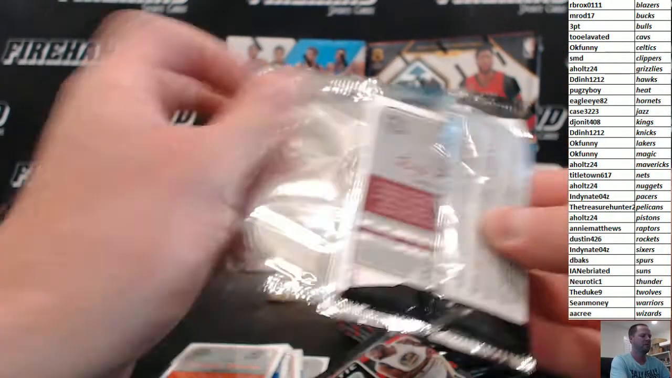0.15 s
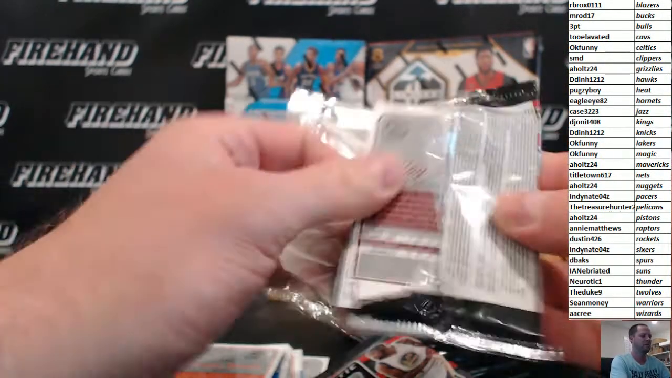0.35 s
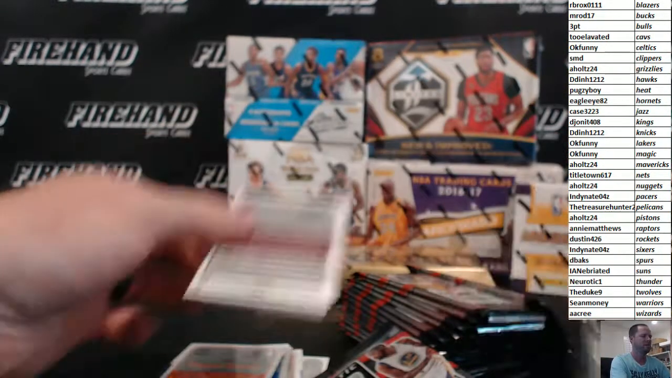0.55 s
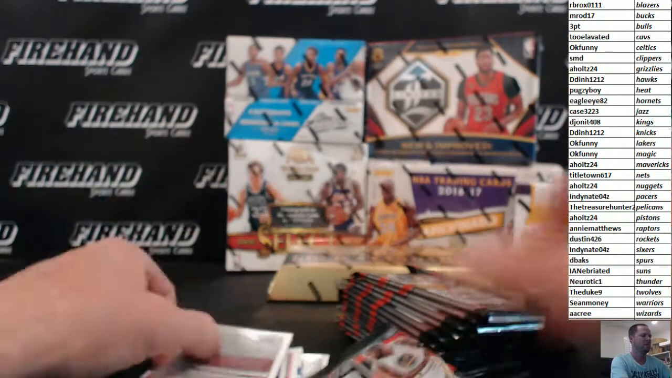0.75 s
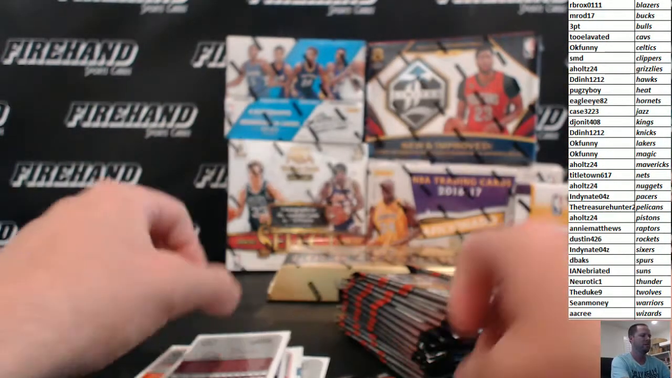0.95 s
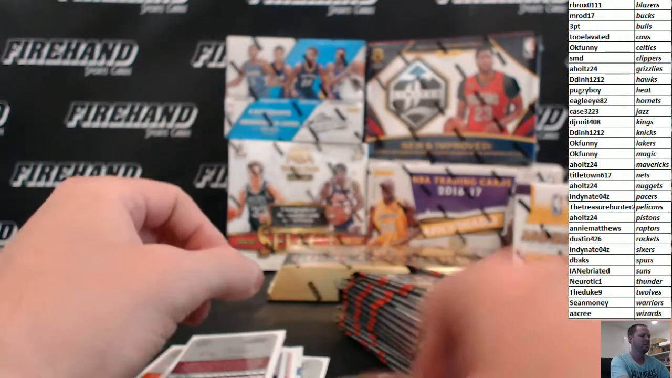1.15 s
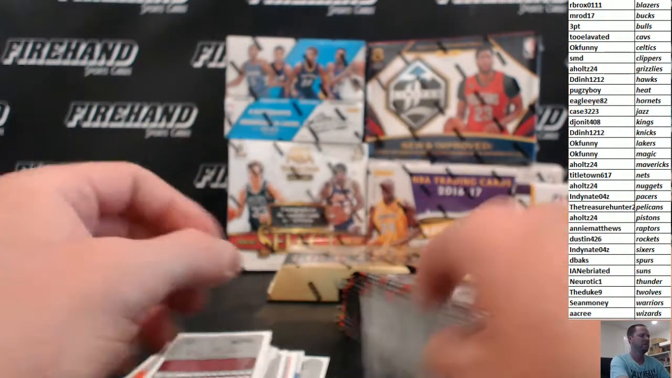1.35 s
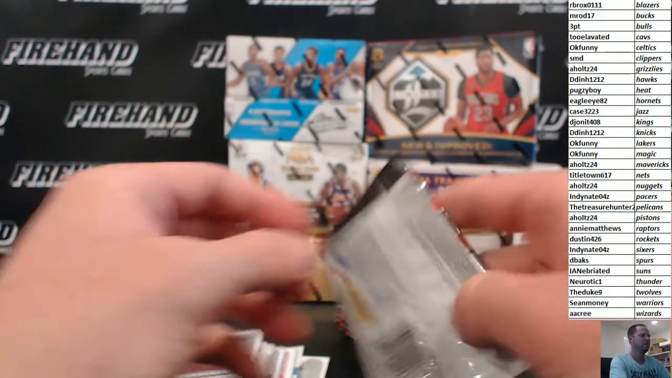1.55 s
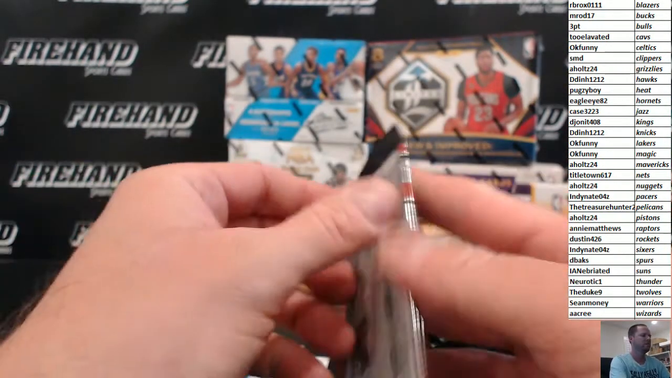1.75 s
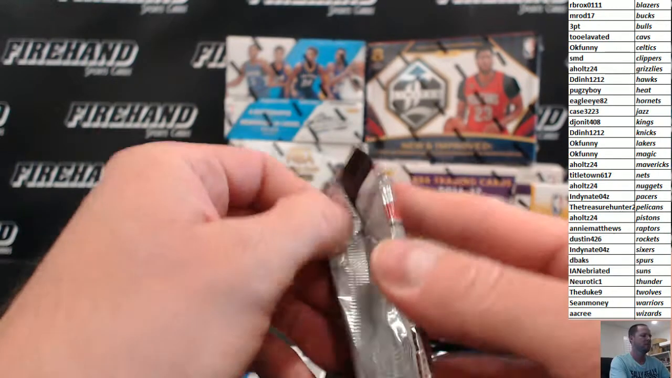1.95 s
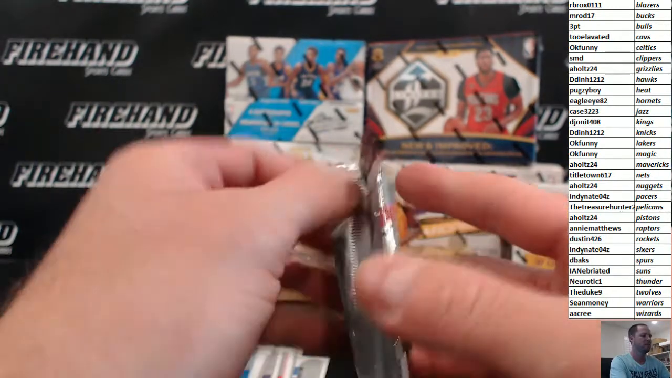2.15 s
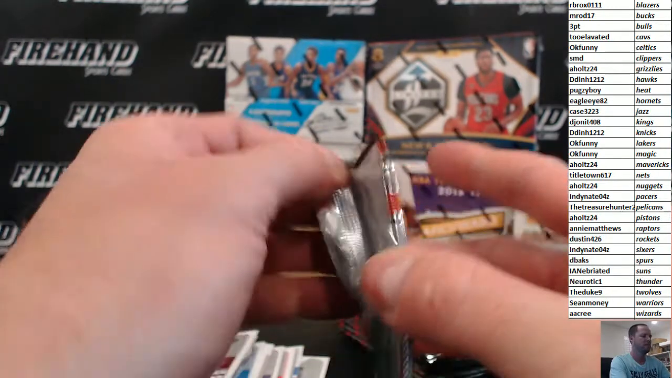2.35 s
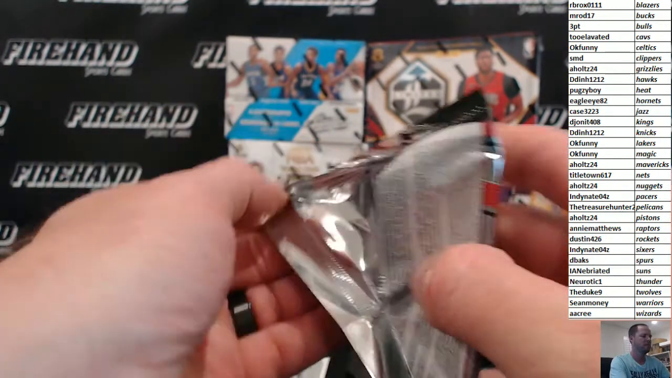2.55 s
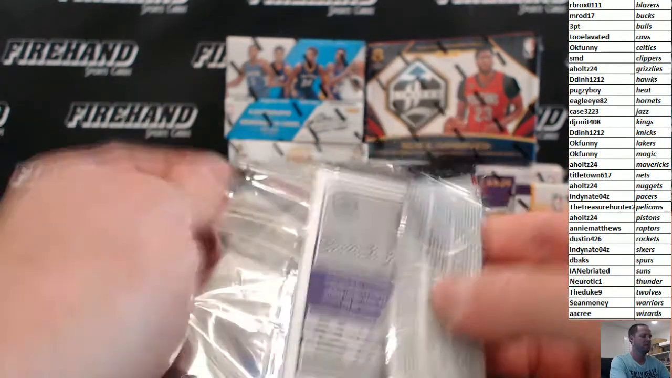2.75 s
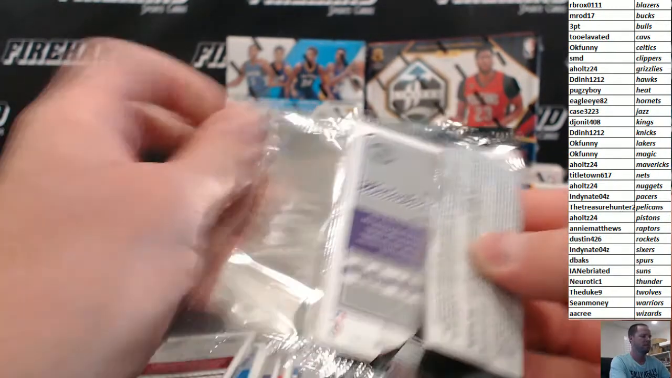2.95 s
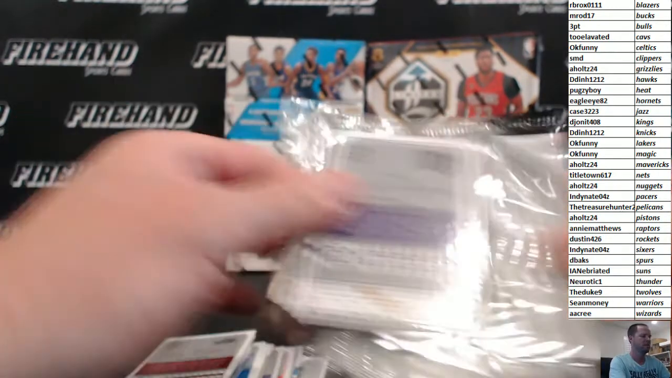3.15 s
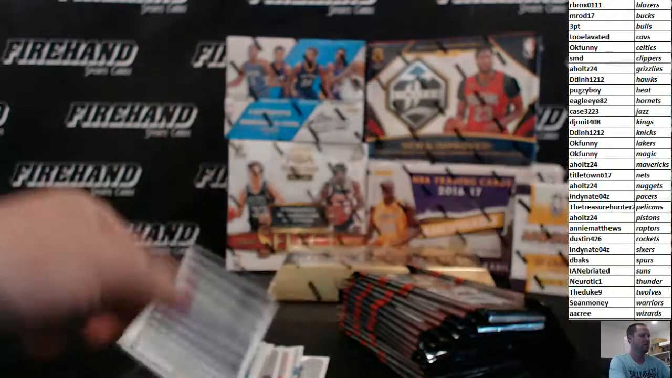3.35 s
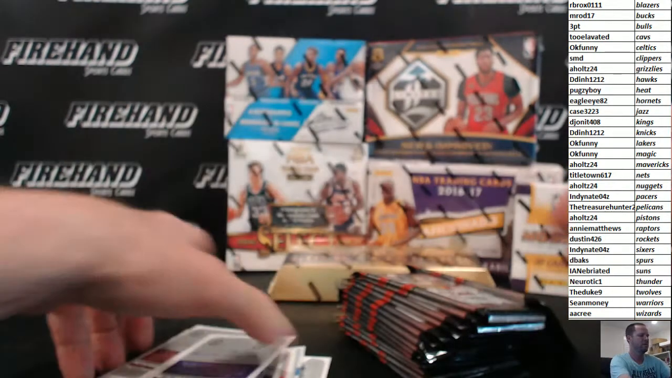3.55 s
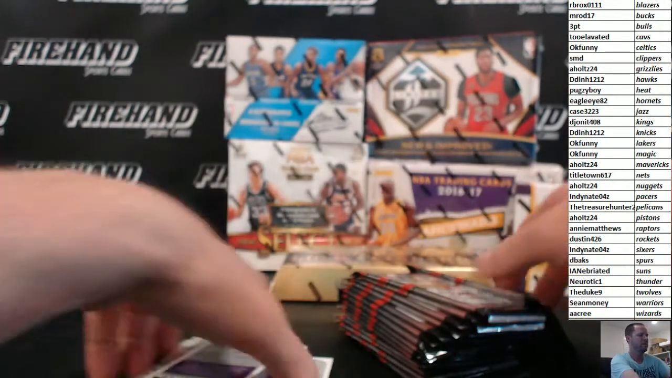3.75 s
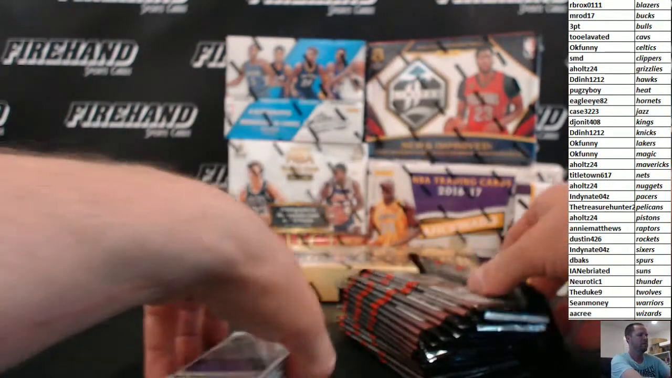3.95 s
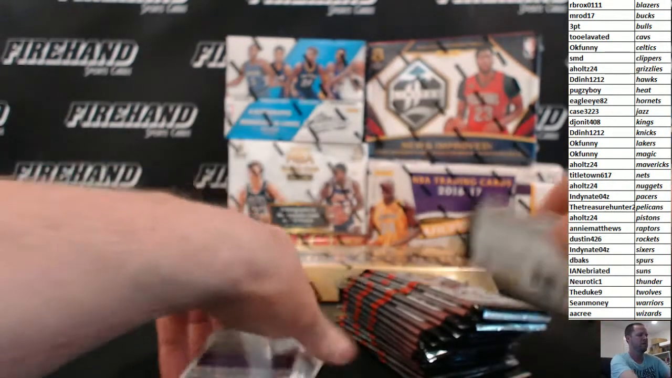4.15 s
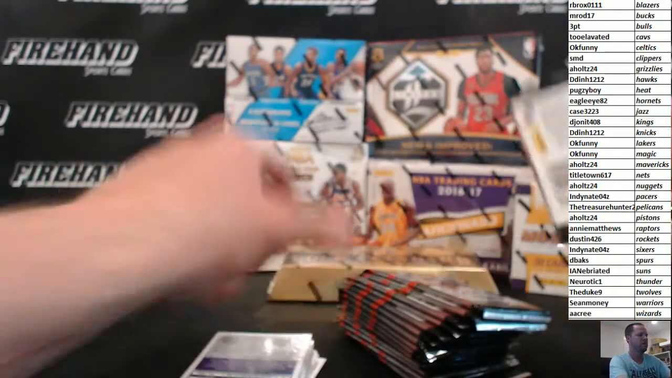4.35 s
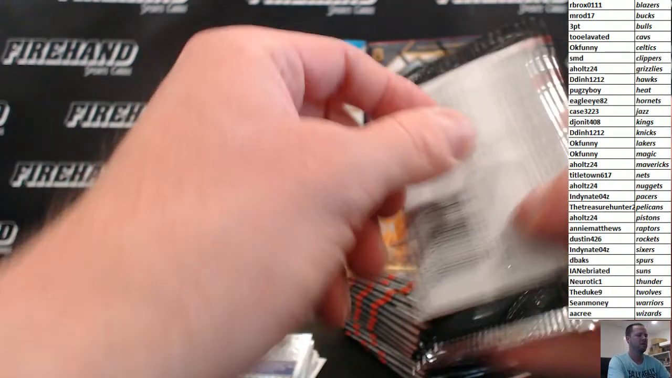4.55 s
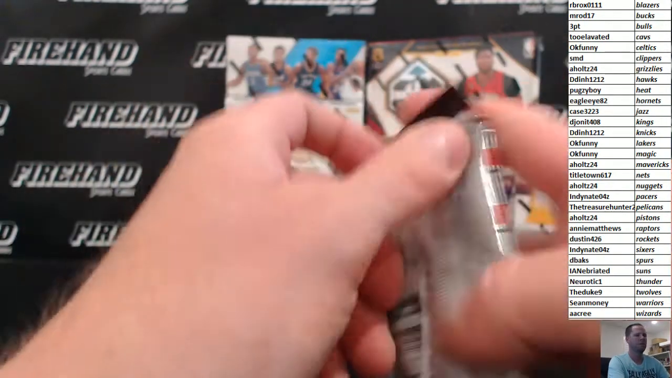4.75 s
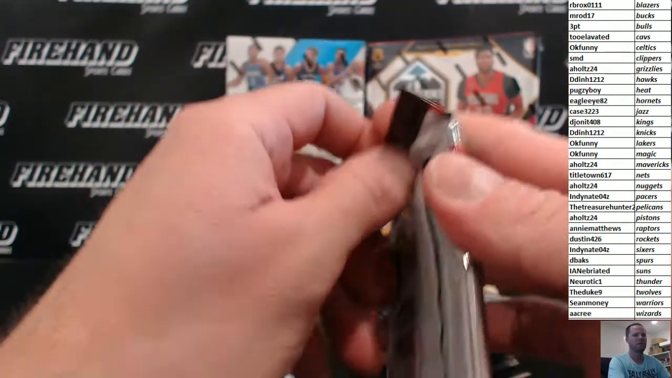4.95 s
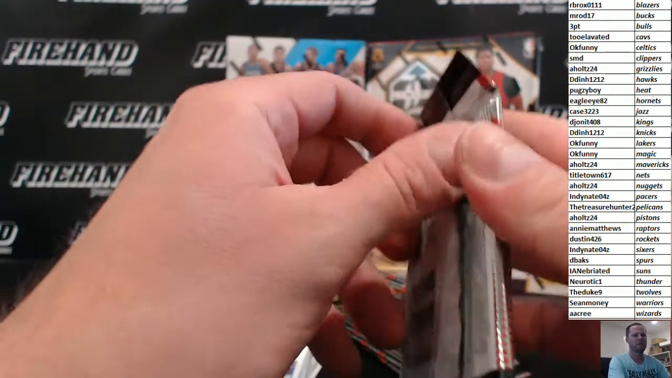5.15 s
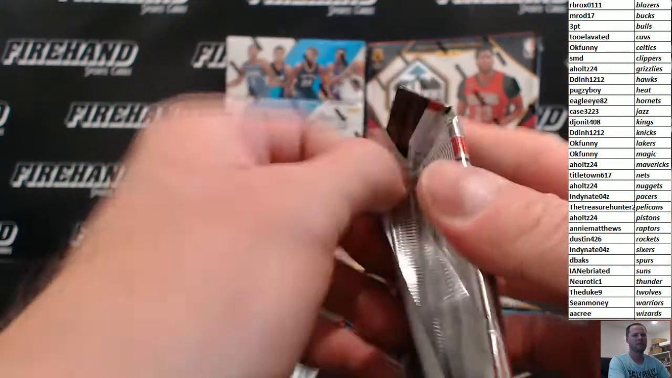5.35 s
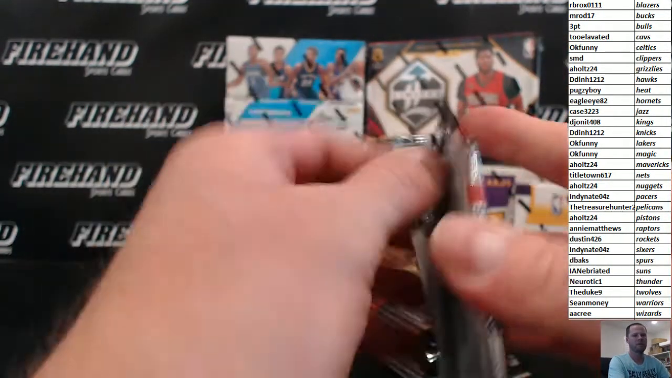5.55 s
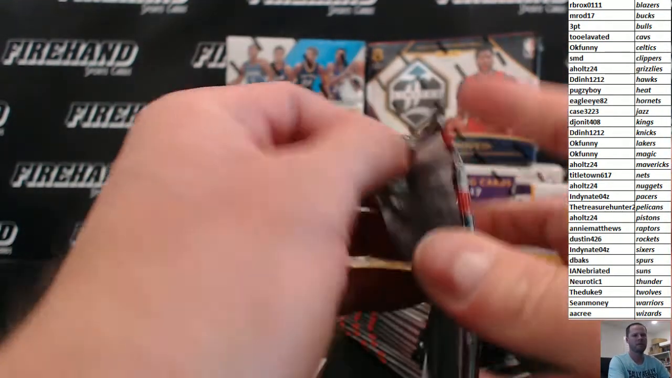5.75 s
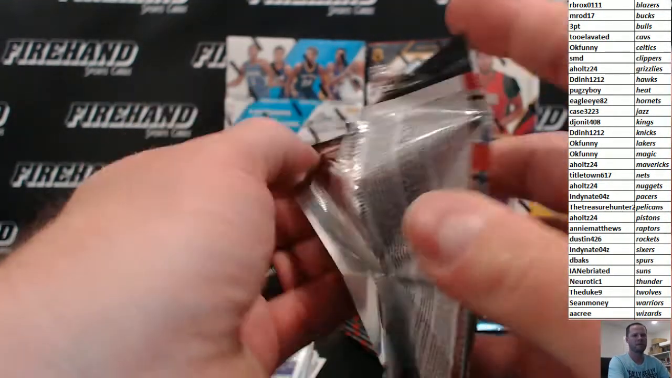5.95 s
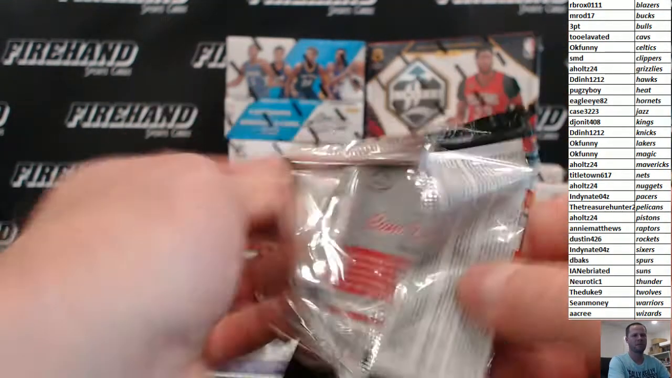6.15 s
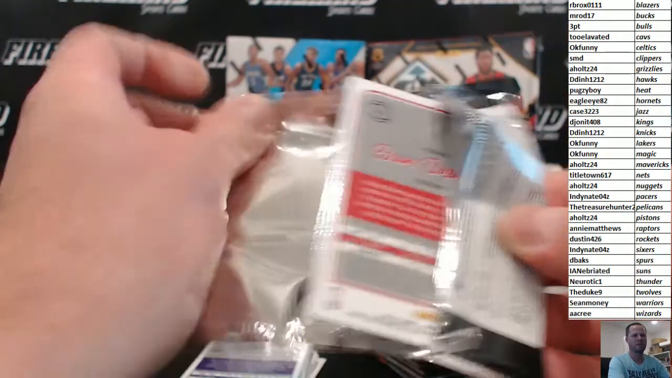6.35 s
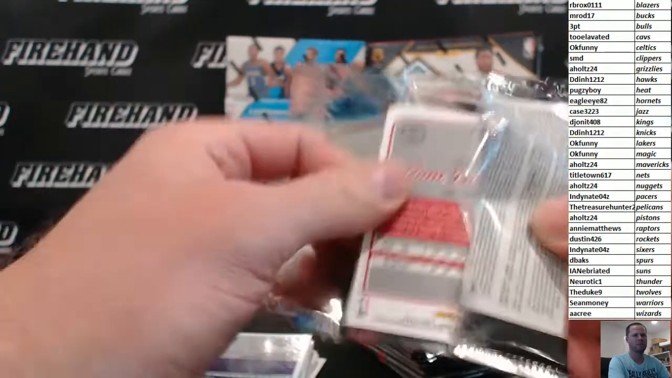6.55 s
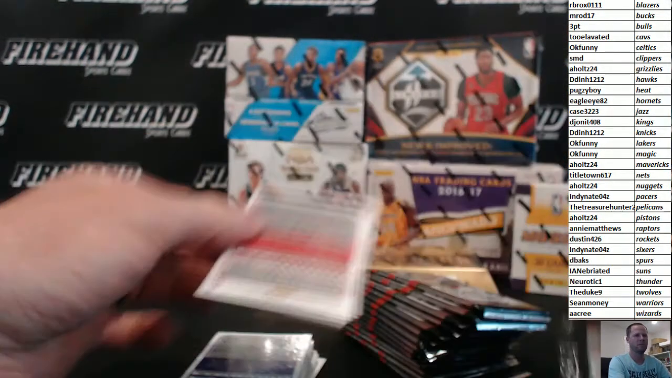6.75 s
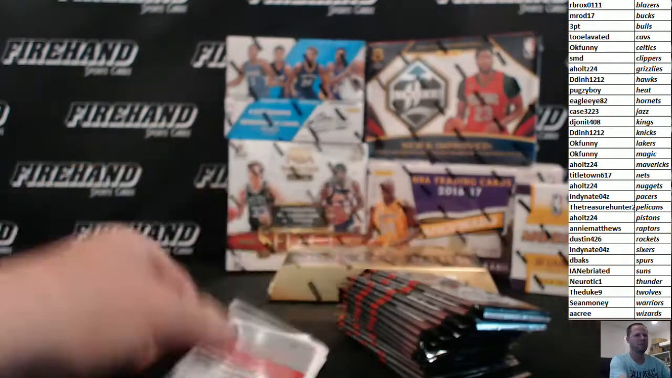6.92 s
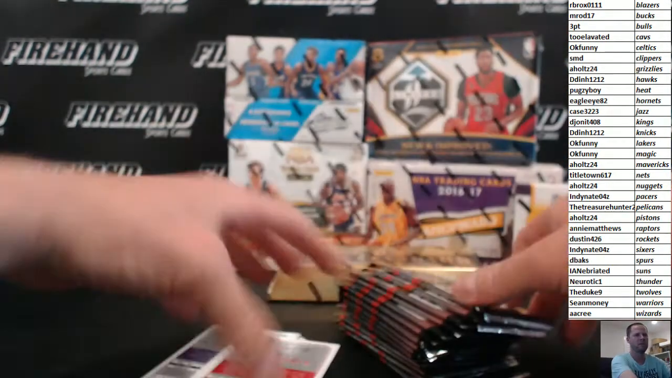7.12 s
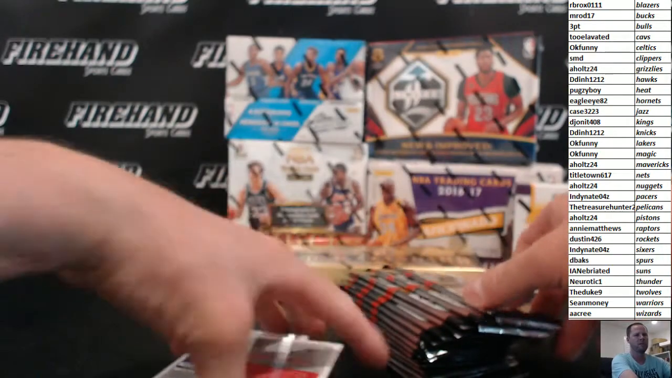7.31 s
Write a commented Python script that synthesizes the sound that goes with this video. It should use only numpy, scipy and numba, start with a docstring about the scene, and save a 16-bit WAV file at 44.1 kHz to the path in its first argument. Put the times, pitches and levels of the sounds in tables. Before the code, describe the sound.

A foil card pack rips open right at the start, close to the microphone and slightly right, with a loud, bright crackle that thins out by 0.4 seconds. Cards land on the table with a dull knock at 0.8. After a brief crinkle, another pack slides off the pile with a soft hiss around 1.6. Pinches and snaps build from 2 seconds into loud rips at 2.5 and 2.8, the slack wrapper flapping. Cards tap and thud down between 3.2 and 3.5. A lone foil snap comes near 4.1. From 4.6 a third pack is picked at with small crackles, growing until it tears loudly at 5.9 and is pulled wide around 6.2. Cards click and settle on the stack from 6.7 to 7 seconds. The small room has a short decay, with soft air and a faint steady low hum throughout.

```python
"""A small room, a table close to the microphone: foil packs of trading cards are opened by hand. Each gets
small pinches at the seam, a hard rip, then a wide pull that lets the slack wrapper flap. Creases snap singly
and in dense runs and set the film and the pouch ringing. A pack slides off the pile with a hiss, and cards drop
on the table with a dull knock. The sound leans to the right, most of all in the low mids; soft room air and a
faint mains hum lie underneath."""
import sys
import numpy as np
from scipy import signal
from scipy.fft import rfft, irfft, next_fast_len
from scipy.io import wavfile
from scipy.ndimage import uniform_filter1d
from numba import njit

SR = 44100
rng = np.random.default_rng(int(sys.argv[2]) if len(sys.argv) > 2 else 0)


def store_pcm(level_fs):
    """Save levels as 16-bit WAV."""
    pcm = np.round(np.clip(level_fs, -1, 1) * 32767).astype(np.int16)
    wavfile.write(sys.argv[1], SR, np.atleast_2d(pcm).T)


N = 329868
TIME = np.arange(N) / SR


def from_db(db):
    """Decibels to gain."""
    return 10 ** (np.asarray(db) / 20)


def rms_one(x):
    """Scale to unit power."""
    return x / np.sqrt(np.mean(x ** 2) + 1e-20)


def at_hz(points, hz):
    """Read a spectrum on a log-frequency axis."""
    known_hz, values = np.transpose(points)
    return np.interp(np.log(np.maximum(hz, 1)), np.log(known_hz), values)


def gains(rows):
    """One gain curve for each dB column, silent before the first time and after the last."""
    s, *columns = np.transpose(rows)
    active = (TIME >= s[0]) & (TIME <= s[-1])
    return [from_db(np.interp(TIME, s, db)) * active for db in columns]


def wander(step_s):
    """A random drift with a spread of about 1."""
    return np.interp(TIME / step_s, np.arange(4096), rng.standard_normal(4096))


def coloured(x, points, size=4096):
    """Causal (minimum-phase) filter that follows a spectrum."""
    hz = np.fft.rfftfreq(size, 1 / SR)
    cepstrum = irfft(np.log(from_db(at_hz(points, hz))))
    cepstrum[1:size // 2] *= 2
    cepstrum[size // 2 + 1:] = 0
    response = irfft(np.exp(rfft(cepstrum)))
    return signal.oaconvolve(x, response)[:len(x)]


def softened(x, cut_hz):
    """A soft contact carries little treble."""
    return signal.sosfilt(signal.butter(2, cut_hz, fs=SR, output="sos"), x)


@njit
def two_pole(x, turn, r):
    """Resonator with gain 1 at its peak; its centre, in radians a sample, may move."""
    y = x.copy()
    x1 = x2 = y1 = y2 = 0.
    for n in range(len(x)):
        y[n] = (x[n] - x2) * (1 - r * r) / 2 + 2 * r * np.cos(turn[n]) * y1 - r * r * y2 + 1e-18
        x2, x1, y2, y1 = x1, x[n], y1, y[n]
    return y


def ring(clicks, modes, scatter, pitch=1):
    """Clicks strike each mode with a strength of their own; power is kept."""
    out, power = 0, 0
    for k, (hz, width_hz, db) in enumerate(modes):
        struck = clicks * ((-1) ** k + scatter * rng.standard_normal(len(clicks)))
        turn = 2 * np.pi * hz * pitch / SR * np.ones(len(clicks))
        damping = np.pi * width_hz / SR
        out = out + from_db(db) * two_pole(struck, turn, np.exp(-damping))
        power += from_db(db) ** 2 * damping
    return out / np.sqrt(power * (1 + scatter ** 2))


def grains(per_s, spread_db, even_s):
    """Random clicks of uneven size, with unit power over a stretch of even_s."""
    sizes = from_db(spread_db * np.minimum(rng.exponential(1, N), 4))
    signs = rng.choice([-1, 1], N)
    clicks = sizes * signs * (rng.random(N) < per_s / SR)
    power = uniform_filter1d(clicks ** 2, int(even_s * SR))
    return clicks / np.sqrt(np.maximum(power, 1e-6))


def strikes(times, levels_db, modes, run_s, scatter, pitch=1, size=3072):
    """Each strike is a run of tiny slips lasting a few run_s, scaled to its loudest 2 ms."""
    out, age = np.zeros(N + size), np.arange(size) / SR
    swell = age / run_s * np.exp(-age / run_s)
    for s, db, ratio in zip(times, levels_db, pitch * np.ones(len(times))):
        sound = ring(rng.standard_normal(size) * swell, modes, scatter, ratio)
        peak = np.sqrt(uniform_filter1d(sound ** 2, SR // 500, mode="constant").max())
        start = round(s * SR)
        out[start:start + size] += from_db(db) * sound / peak
    return out[:N]


def stroke(age, rise_s, fall_s, fall_db=31.5):
    """Gain of one movement of the fingers: it swells, then dies away ever faster."""
    swell = np.clip(age / rise_s, 0, 1) ** 0.85
    settled = np.clip((age - rise_s) / fall_s, 0, 3)
    return swell * from_db(-fall_db * settled ** 1.267)


# The still room, all round the microphone. Each row: frequency in Hz, relative level in dB.
ROOM_AIR = [(18, -56.5), (30, -27), (54, -28), (90, -6), (122, -4), (175, -14), (239, -9), (563, -15),
            (649, -16), (1770, -21.5), (2710, -30), (6880, -35), (8940, -48.5), (11600, -87), (19700, -120)]


def background(air_db=-66, hum_hz=117.5, hum_db=-66.5):
    """Soft room air, nearly the same on both sides, and a mains hum in the centre."""
    mid = rms_one(coloured(rng.standard_normal(N), ROOM_AIR))
    side = from_db(-11) * rms_one(coloured(rng.standard_normal(N), ROOM_AIR))
    air = np.array([mid + side, mid - side])
    hum = np.sqrt(2) * np.sin(2 * np.pi * hum_hz * TIME)
    return from_db(air_db) * air + from_db(hum_db) * hum


# The small room's short decay. Each row: frequency in Hz, seconds to fall by 60 dB.
ROOM_DECAY = [(150, 0.18), (400, 0.12), (1000, 0.17), (2800, 0.21), (7300, 0.26)]
# What the walls send back. Each row: frequency in Hz, gain in dB.
WALL_COLOUR = [(100, -12.5), (400, -9), (1000, -7), (2000, -6), (4000, -3), (8000, -9.5)]


def room_response(gap_s, size=16384):
    """Dense reflections build up after a short gap and die away band by band."""
    age, hz = np.arange(size) / SR, np.fft.rfftfreq(size, 1 / SR)
    centres_hz, decays_s = np.transpose(ROOM_DECAY)
    build_up = np.clip(age / gap_s - 1, 0, 1)
    white, out = rfft(rng.standard_normal(size)), 0
    for t60, one_band in zip(decays_s, np.eye(len(decays_s))):
        share = at_hz(np.column_stack([centres_hz, one_band]), hz)
        fade = build_up * from_db(-60 * age / t60)
        out = out + irfft(white * share) * fade / np.sqrt(np.sum(fade ** 2))
    return coloured(out, WALL_COLOUR)


# The balance between the two sides, leaning right in the low mids. Each row: frequency in Hz, left minus right
# in dB.
SIDE_BALANCE = [(90, -1), (130, -0.5), (180, -6), (270, -11), (520, -9.5), (750, -2.5), (1050, -5),
                (1280, -2), (1950, -4), (2500, 0.5), (4500, 0.5), (6500, 1)]
# How much the balance wavers. Each row: frequency in Hz, level against the whole sound in dB.
BALANCE_WAVER = [(100, -26), (260, -15.5), (550, -16), (1000, -23.5), (2000, -20.5), (4000, -29.5),
                 (7000, -26.5)]


def panned(x):
    """Share a sound between the microphone's two ports band by band, with no lag between them."""
    size = next_fast_len(N + 8192)
    hz = np.fft.rfftfreq(size, 1 / SR)
    ratio = from_db(at_hz(SIDE_BALANCE, hz))
    steady = rfft(x, size) * 2 * ratio / (1 + ratio)
    waver = rfft(x * wander(step_s=0.03), size) * from_db(at_hz(BALANCE_WAVER, hz))
    left = irfft(steady + waver, size)[:N]
    return np.array([left, 2 * x - left])


# The room's width at the microphone. Each row: frequency in Hz, side against mid reflections in dB.
ROOM_WIDTH = [(100, -9.5), (250, -2.5), (600, -7.5), (1000, -16.5), (2000, -17), (3000, -25), (7000, -25.5)]


def room(x, sway_hz=1.1):
    """The reflections change as the hands move; the close-set ports hear nearly the same ones."""
    sway = 2 * np.pi * sway_hz * TIME
    mid = 0
    for share in (np.cos(sway), np.sin(sway)):
        mid = mid + signal.oaconvolve(x * share, room_response(gap_s=0.00034))[:N]
    side = signal.oaconvolve(x, room_response(gap_s=0.0017))[:N]
    side = coloured(side, ROOM_WIDTH)
    return panned(mid) + np.array([side, -side])


# A finger on a card, barely heard even this close. Each row: time in seconds, relative level in dB.
BRUSH_STROKE = [(3.88, -96), (3.9, -79.5), (3.942, -61.5), (3.956, -61.5), (4.02, -98)]
# Its thin hiss. Each row: frequency in Hz, relative level in dB.
BRUSH_HISS = [(1000, -8), (3500, -20.5), (5200, -12), (6600, 3), (8500, -8.5)]


def brushing():
    """A finger brushes over a card with a smooth friction hiss."""
    hiss = rms_one(coloured(rng.standard_normal(N), BRUSH_HISS))
    return from_db(6.5) * gains(BRUSH_STROKE)[0] * hiss


# A pack dragged off the pile. Each row: time in seconds, rub and shudder in relative dB.
PACK_DRAG = [(1.5, -69.5, -67), (1.516, -55.5, -66.5), (1.592, -38, -35.5), (1.678, -44.5, -46),
             (1.698, -51, -66), (1.706, -48.5, -47), (1.77, -57, -75)]
# The hiss of its rub. Each row: frequency in Hz, relative level in dB.
DRAG_HISS = [(300, -44), (900, -19), (1200, -7), (1500, -13), (2100, 4), (3100, -11.5), (5200, -4),
             (6800, -4.5), (8500, -14.5)]
# Modes of the pile under it. Each row: frequency in Hz, width in Hz, relative level in dB.
PILE_MODES = [(272, 156, -4.5), (419, 76, 6)]


def sliding():
    """Fine friction grains hiss, and coarser slips shake the pile."""
    rub, shudder = gains(PACK_DRAG)
    friction = grains(per_s=9000, spread_db=1.5, even_s=0.02)
    hiss = rub * rms_one(coloured(friction, DRAG_HISS))
    slips = grains(per_s=410, spread_db=-2, even_s=0.018)
    shake = shudder * ring(slips, PILE_MODES, scatter=0.7)
    return from_db(-2.5) * hiss + from_db(2.5) * softened(shake, cut_hz=430)


# Cards dropped near the microphone. Each row: start in seconds, thud and knock in relative dB.
CARD_DROPS = [(0.826, -30.5, -35.5), (0.833, -32, -53), (0.845, -30.5, -44), (3.242, -35.5, -43),
              (3.256, -52.5, -55), (3.471, -33, -30), (3.48, -28, -39.5), (3.491, -28.5, -50),
              (6.923, -34.5, -48), (6.941, -34, -45.5), (6.951, -37.5, -44), (7.02, -40.5, -35)]
# Modes of table top and card stack. Each row: frequency in Hz, width in Hz, relative level in dB.
TABLE_MODES = [(116.1, 27.5, 3.5), (124.6, 24.3, -0.5), (173, 13.6, -7), (285, 26, -7.5)]
STACK_MODES = [(338, 254, 2), (520, 220, 3), (650, 240, -3.5), (967, 234, -1), (1430, 57, -3),
               (1590, 200, -9.5)]


def landings():
    """Cards land flat with a dull knock; the hand behind them thuds into the table top."""
    s, thud_db, knock_db = np.transpose(CARD_DROPS)
    thud = strikes(s, thud_db + 1.5, TABLE_MODES, run_s=0.0012, scatter=0.31)
    knock = strikes(s, knock_db - 1.5, STACK_MODES, run_s=0.0025, scatter=0.53)
    return softened(thud, cut_hz=470), softened(knock, cut_hz=860)


# Card edges clicking on the stack. Each row: start in seconds, knock and tick in relative dB.
EDGE_CLICKS = [(0.844, -32.5, -37.5), (3.418, -33, -65), (6.696, -28.5, -39), (6.755, -48, -61.5),
               (6.942, -34, -64), (7.011, -52, -57)]
# Modes of a card's edge. Each row: frequency in Hz, width in Hz, relative level in dB.
EDGE_MODES = [(2730, 200, 12), (3500, 200, 4.5), (6500, 900, 11), (6900, 430, 8.5)]


def edges():
    """A stiff card edge scuffs against the stack for a few milliseconds."""
    s, knock_db, tick_db = np.transpose(EDGE_CLICKS)
    knock = strikes(s, knock_db - 1, STACK_MODES, run_s=0.002, scatter=0.9)
    tick = strikes(s, tick_db + 1, EDGE_MODES, run_s=0.002, scatter=0.7)
    return softened(knock, cut_hz=2200) + tick


# Cards settling on the stack. Each row: start, rise and fall in seconds, slap and paper in relative dB.
CARD_PATS = [(0.816, 0.016, 0.05, -37.5, -52.5), (3.402, 0.017, 0.099, -38.5, -53.5),
             (3.465, 0.015, .06, -45.5, -55.5), (6.661, 0.022, 0.056, -43, -57),
             (6.915, 0.028, 0.079, -45.5, -53.5), (7.01, 0.013, 0.059, -38, -68)]
# Modes of the paper. Each row: frequency in Hz, width in Hz, relative level in dB.
PAPER_MODES = [(1690, 690, -5), (2240, 290, 4.5), (2960, 1100, -3), (3900, 1300, -5.5)]


def patting():
    """Loose cards meet the stack in many small contacts: a soft slap with a papery scuff."""
    slap, paper = np.zeros((2, N))
    for start_s, rise_s, fall_s, slap_db, paper_db in CARD_PATS:
        span = slice(int(start_s * SR), int((start_s + rise_s + 2 * fall_s) * SR))
        press = stroke(TIME[span] - start_s, rise_s, fall_s)
        slap[span] += from_db(slap_db) * press
        paper[span] += from_db(paper_db) * press
    contacts = grains(per_s=2700, spread_db=4.5, even_s=0.015)
    body = ring(contacts * slap, STACK_MODES, scatter=0.73)
    scuff = ring(contacts * paper, PAPER_MODES, scatter=0.8)
    return softened(body, cut_hz=1950) + softened(scuff, cut_hz=11000)


# The hold on the pouch. Each row: time in seconds, pitch ratio.
POUCH_GRIP = [(0, 1.155), (.3, 0.85), (.35, 1.07), (.5, 1.33), (.7, 1.08), (1.4, 1.14), (2.45, 0.99),
              (2.72, 1.175), (2.9, 1.02), (3.18, 0.94), (4.1, 1.2), (4.8, 1.14), (5.2, 1), (5.9, 1.007),
              (6.16, 1.186), (6.9, 0.95)]


def grip(s):
    """The grip stiffens or slackens the pouch and shifts its ring: the pitch ratio at times s."""
    return np.interp(s, *np.transpose(POUCH_GRIP))


# How loose the wrapper hangs. Each row: time in seconds, flap against sheet in relative dB.
WRAPPER_SLACK = [(0, -12), (0.06, -2), (1.5, 0), (2.0, -6.5), (2.28, -18), (2.39, -14), (2.51, -9),
                 (2.72, -20.5), (2.8, 1.5), (3.3, -0.5), (4.1, -10), (5.3, -15.5), (5.57, -2), (5.72, -21),
                 (5.88, -15), (6.16, -22), (6.24, 1), (6.8, 5.5)]


def slack(s):
    """A slack wrapper flaps, a taut one hardly does: the flap's gain in dB at times s."""
    return np.interp(s, *np.transpose(WRAPPER_SLACK))


# Three packs flexed and torn close to the microphone; the third takes longer to give way.
# Each row: start, rise and fall in seconds, then crease, pouch and sheet in relative dB.
FOIL_FLEXES = [ (0.0, 0.001, 0.098, -28.5, -26, -27.5), (0.025, 0.0047, 0.15, -19, -21.5, -26),
               (0.039, 0.025, 0.15, -32, -25.5, -19), (0.189, 0.008, 0.02, -43.5, -62, -36.5),
               (0.346, 0.02, 0.074, -36, -38, -44.5), (0.44, 0.0072, 0.043, -51, -46, -48),
               (0.5, 0.09, 0.69, -63.5, -63.5, -64.5), (1.25, 0.088, 0.067, -64.5, -74, -74.5),
               (1.372, 0.0095, 0.11, -49, -40.5, -43), (1.41, 0.045, 0.034, -47, -49, -46),
               (1.858, 0.0024, 0.065, -52, -45, -55), (1.907, 0.018, 0.18, -43.5, -51, -67),
               (1.987, 0.025, 0.049, -38.5, -30.5, -30), (2.016, 0.013, 0.1, -32.5, -34, -68),
               (2.155, 0.013, .08, -51, -49.5, -59), (2.252, 0.015, 0.27, -38, -36.5, -46),
               (2.32, 0.022, .08, -33.5, -27.5, -40), (2.375, 0.015, 0.2, -30.5, -28.5, -33.5),
               (2.498, 0.017, 0.16, -18.5, -19, -22.5), (2.63, 0.035, 0.13, -33.5, -32.5, -63),
               (2.685, 0.024, 0.17, -27.5, -23.5, -36.5), (2.747, 0.034, 0.15, -21.5, -20, -19.5),
               (2.888, .035, 0.032, -39.5, -54, -44), (3.094, 0.015, 0.059, -56.5, -71, -54),
               (3.17, 0.015, 0.12, -44, -47.5, -55.5), (3.194, 0.047, 0.034, -47.5, -46.5, -44.5),
               (4.067, 0.0072, .06, -49, -48.5, -46.5), (4.515, 0.012, 0.076, -58.5, -69, -56),
               (4.637, 0.042, 0.096, -59, -61, -47.5), (4.701, 0.084, .06, -53.5, -59, -58),
               (4.77, .02, 0.22, -62, -54, -74.5), (4.874, 0.02, 0.1, -41, -49.5, -64),
               (5.03, 0.017, 0.083, -51, -68, -72), (5.181, 0.0042, 0.2, -48.5, -44, -70),
               (5.231, 0.0073, 0.25, -41, -47.5, -63), (5.368, 0.006, 0.079, -38.5, -46, -44.5),
               (5.42, 0.026, .14, -36.5, -40.5, -56), (5.555, 0.013, 0.088, -49.5, -57, -47),
               (5.579, 0.014, 0.069, -41, -36.5, -49), (5.634, 0.038, 0.33, -46, -39.5, -53.5),
               (5.702, 0.018, 0.48, -36.5, -35, -51), (5.769, 0.037, 0.24, -33.5, -26.5, -33),
               (5.873, 0.0031, .06, -22.5, -15.5, -19.5), (5.883, 0.03, 0.14, -19.5, -18.5, -22.5),
               (5.971, 0.058, 0.089, -38, -38, -48), (6.109, 0.015, 0.038, -36.5, -38, -57),
               (6.13, 0.014, 0.15, -25.5, -19.5, -25), (6.165, 0.047, 0.05, -24.5, -23.5, -26),
               (6.224, 0.016, 0.13, -22.5, -19, -20.5), (6.321, 0.031, 0.047, -40.5, -39, -40),
               (6.411, .06, 0.32, -64, -63.5, -66), (6.564, .01, 0.023, -50, -49, -56.5),
               (6.629, 0.063, 0.037, -52, -57, -45), (6.745, 0.01, 0.15, -58.5, -61.5, -59.5)]


def flexing():
    """Each flex swells as the fingers press and dies as the foil settles: crease, pouch, sheet gains."""
    fall_shares = (1, 1, 0.91)   # the whole sheet settles sooner than its creases
    power = np.zeros((3, N))
    for start_s, rise_s, fall_s, *levels_db in FOIL_FLEXES:
        span = slice(int(start_s * SR), int((start_s + rise_s + 2 * fall_s) * SR))
        for part, share in enumerate(fall_shares):
            press = stroke(TIME[span] - start_s, rise_s, fall_s * share)
            power[part, span] += (from_db(levels_db[part]) * press) ** 2
    return np.sqrt(power)


# What rings in a wrapper heard close up, from the small facets to the whole flapping sheet.
# Each row: frequency in Hz (before grip or facet size shifts it), width in Hz, relative level in dB.
CREASE_MODES = [(2385, 200, -2.5), (3020, 760, 0), (3880, 1600, -1), (5000, 350, 5), (5700, 450, 2),
                (7330, 2200, 4.5), (7730, 130, -2.5)]
POUCH_MODES = [(1430, 82, -2), (1607, 130, 3.5), (1853, 110, 1), (2240, 450, -3.5)]
SHEET_MODES = [(769, 210, -1.5), (979, 64, 2), (1094, 110, 0.6), (1310, 100, -5)]
FLAP_MODES = [(117, 26, -8.5), (180, 75, -3.5), (264, 73, 3), (412, 55, 5.5), (555, 130, -2.5)]


def crinkling():
    """The harder the foil is worked, the more creases give way each second and ring all its parts."""
    crease, pouch, sheet = flexing()
    flap = sheet * from_db(slack(TIME))
    per_s = 350 + 2800 * (crease / from_db(-24)) ** 0.7
    rubbing = from_db(-12) * rng.standard_normal(N)   # film sliding on film, between the clicks
    clicks = grains(per_s, spread_db=3.5, even_s=0.023) + rubbing
    facet_size = np.exp(0.084 * wander(step_s=0.0079))   # the facets keep folding into new shapes
    facets = from_db(2.5) * ring(clicks * crease, CREASE_MODES, scatter=0.44, pitch=1 / facet_size)
    hollow = from_db(-3) * ring(clicks * pouch, POUCH_MODES, scatter=3.8, pitch=grip(TIME))
    film = from_db(-1) * ring(clicks * sheet, SHEET_MODES, scatter=1.2)
    flapping = from_db(-3.5) * ring(clicks * flap, FLAP_MODES, scatter=1.0)
    return facets + hollow + film + flapping


# Single snaps of the foil, right in the foreground.
# Each row: start in seconds, then crease, pouch and sheet in relative dB.
FOIL_SNAPS = [(0.0268, -23, -22, -26), (0.0412, -10, -35, -33), (0.0526, -10, -29, -12),
              (0.0676, -17, -31, -17), (0.079, -29, -44, -25), (0.1697, -20, -43, -44),
              (0.1998, -26, -59, -32.5), (0.3577, -17.5, -29.5, -50), (0.368, -34, -51, -55),
              (0.686, -44, -47, -68), (1.378, -27, -33.5, -55), (1.4353, -30, -37, -33),
              (1.703, -29.5, -39.5, -44), (1.924, -46, -41, -64), (1.9696, -26.5, -38, -69),
              (2.0006, -19.5, -51, -32.5), (2.026, -14.5, -29.5, -32.5), (2.1714, -33.5, -50, -43),
              (2.2564, -24.5, -50, -38), (2.2732, -25, -24, -24.5), (2.3297, -23.5, -20, -32),
              (2.3415, -38, -30, -38), (2.37, -18, -21, -24.5), (2.3882, -21.5, -20.5, -26.5),
              (2.3993, -22, -42, -22.5), (2.4144, -24, -38, -27.5), (2.4562, -26.5, -26, -45),
              (2.4993, -5, -14, -11), (2.5175, -6.5, -18, -28), (2.6699, -23, -37, -53),
              (2.7144, -24.5, -19, -42.5), (2.7838, -5, -21, -8.5), (2.7964, -32, -43, -12),
              (3.055, -47, -68, -66), (3.1823, -29.5, -50.5, -55), (3.2371, -30.5, -53, -50.5),
              (4.0746, -24, -45.5, -47), (4.3707, -61, -58, -75), (4.5202, -45.5, -66.5, -43.5),
              (4.6641, -32.5, -59.5, -38), (4.6996, -45, -58, -44), (4.7296, -42, -64, -40),
              (4.7603, -36, -60.5, -56.5), (4.7756, -44, -43, -41), (4.8513, -41, -48.5, -66.5),
              (4.891, -36, -54.5, -59.5), (4.9002, -31.5, -39.5, -57.5), (4.9295, -31.5, -53, -67),
              (5.0418, -44.5, -66.5, -61), (5.0647, -33.5, -56, -71), (5.1183, -34, -66.5, -59.5),
              (5.1817, -29.5, -34, -64.5), (5.2462, -22.5, -36.5, -43), (5.3771, -21.5, -38, -48),
              (5.39, -27.5, -32, -35), (5.4094, -23.5, -39, -60), (5.444, -26, -34, -58),
              (5.466, -23, -56, -63), (5.4803, -17, -51, -64), (5.5853, -27.5, -40, -37.5),
              (5.595, -20, -53, -36), (5.6465, -24, -30, -57), (5.7114, -23.5, -20.5, -27.5),
              (5.757, -31, -25.5, -46), (5.7807, -24, -18.5, -40), (5.8148, -11.5, -21, -12),
              (5.8748, -10.5, -7.5, -7), (5.8774, -8, -21, -17.5), (5.9325, -11.5, -30, -13),
              (5.9427, -14, -9, -20), (6.1975, -14, -18, -16.5), (6.2341, -8, -9, -10),
              (6.2495, -48, -31, -15), (6.566, -28.5, -46, -49.5)]


def snapping():
    """Large creases buckle one at a time, each with facets of its own size."""
    s, crease_db, pouch_db, sheet_db = np.transpose(FOIL_SNAPS)
    facet_size = np.exp(0.046 * rng.standard_normal(len(s)))
    facets = strikes(s, crease_db - 4.5, CREASE_MODES, run_s=0.0005, scatter=1.6, pitch=1 / facet_size)
    hollow = strikes(s, pouch_db - 3, POUCH_MODES, run_s=0.0015, scatter=1.0, pitch=grip(s))
    film = strikes(s, sheet_db - 3, SHEET_MODES, run_s=0.00061, scatter=0.9)
    flapping = strikes(s, sheet_db + slack(s) - 1.5, FLAP_MODES, run_s=0.00068, scatter=0.68)
    return facets + hollow + film + flapping


def scene():
    """The foil and cards sound louder on the right; the table's thud reaches both ports alike."""
    thud, knock = landings()
    foil = crinkling() + snapping()
    cards = sliding() + brushing() + edges() + patting() + knock
    # cards on the table send less into the room than foil held up
    reflected = room(foil + from_db(-6.5) * cards)
    direct = from_db(-1.13) * panned(foil + cards)
    return background() + reflected + thud + direct


# The microphone at the table. Each row: frequency in Hz, gain in dB.
MICROPHONE_RESPONSE = [(40, -11), (70, -13.5), (100, -3), (1000, -2), (2400, -1), (2750, -5), (3600, -1.5),
                       (7300, -4), (8000, -14.5), (8600, -21), (9100, -36)]


def record(dry):
    """A small speech-band microphone: thin bass and a steep top."""
    cutoff_hz = 9000
    steep_top = signal.ellip(10, 0.2, 75, cutoff_hz, fs=SR, output="sos")
    sound = np.array([coloured(channel, MICROPHONE_RESPONSE) for channel in dry])
    return signal.sosfilt(steep_top, sound)


dry = scene()
out = record(dry)
store_pcm(out)
```